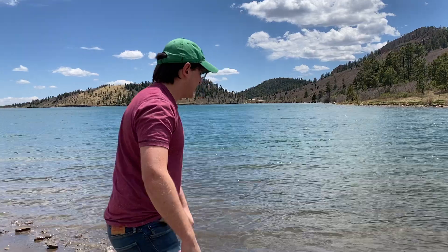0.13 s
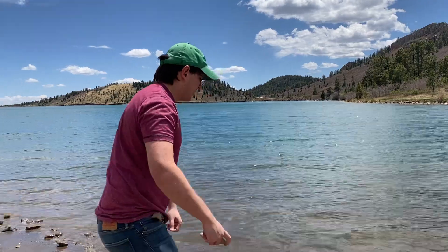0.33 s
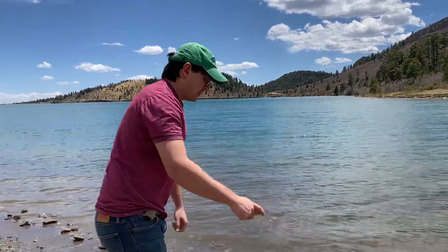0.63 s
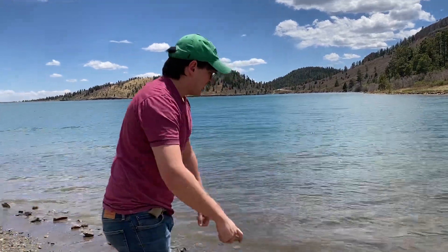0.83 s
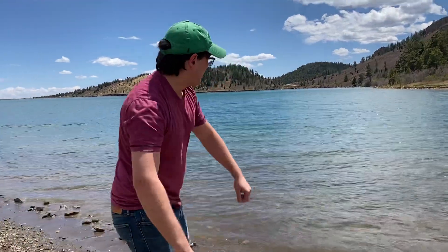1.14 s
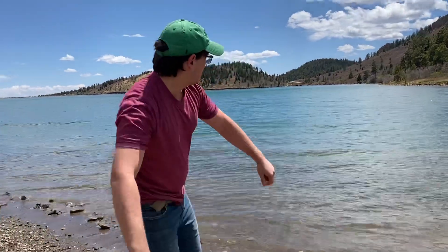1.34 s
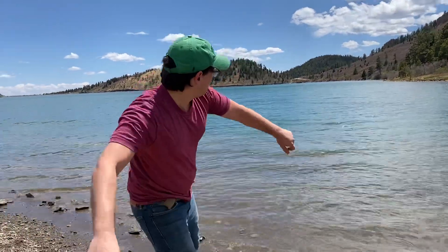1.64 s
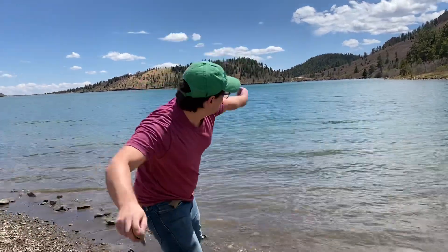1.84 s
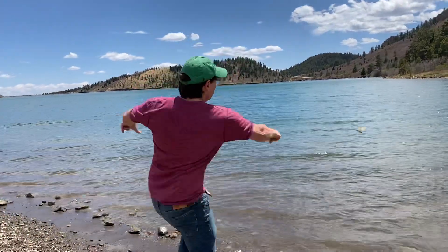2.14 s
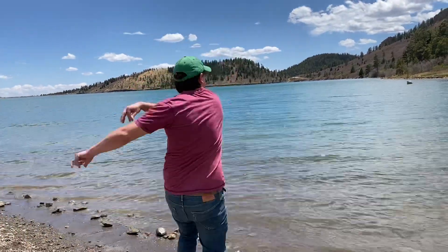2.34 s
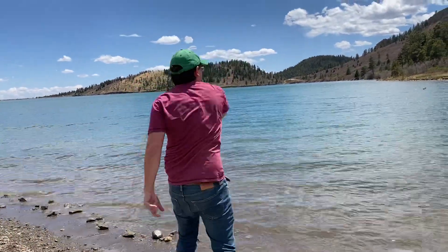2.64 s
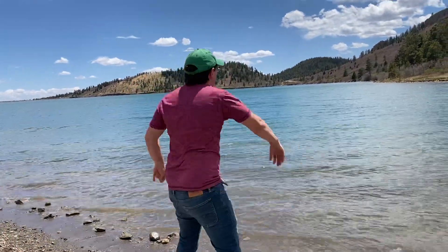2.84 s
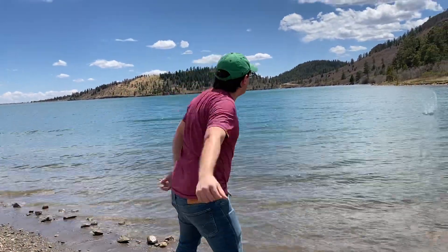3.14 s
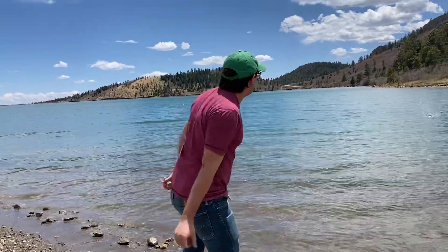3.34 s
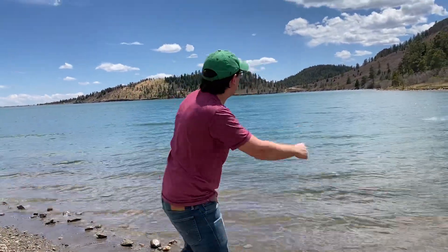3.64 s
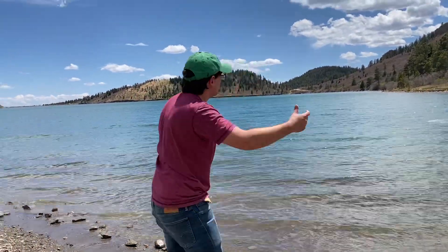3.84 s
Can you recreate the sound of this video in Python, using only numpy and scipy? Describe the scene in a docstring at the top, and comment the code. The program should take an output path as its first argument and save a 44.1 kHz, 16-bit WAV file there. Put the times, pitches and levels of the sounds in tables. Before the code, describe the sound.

Wind rumbles and flutters on a microphone while small waves lap a pebbly lake shore.

```python
"""Wind rumbles and flutters on a microphone at a pebbly lake shore; its eddies are short thumps that fall in pitch.
Small waves wash, gurgle and slop along the water's edge: shaped noise, ringing bubbles and a wandering hollow tone.
Shoes scuff the gravel during a throw: tiny random contacts over a grinding hiss.
Stones click, once sharply, as short bundles of ringing tones; pebbles knock dully and grit ticks."""
import sys
import numpy as np
from scipy import signal
from scipy.fft import rfft, irfft
from scipy.io import wavfile

SR = 44100
rng = np.random.default_rng(int(sys.argv[2]) if len(sys.argv) > 2 else 0)


def put_to_file(sound):
    """Save the sound as 16-bit audio at rate SR, in the file named by the first command-line argument."""
    columns = np.atleast_2d(sound).T  # one column per channel
    safe = np.clip(columns, -1, 1)
    whole_steps = np.round(safe * 32767)
    wavfile.write(sys.argv[1], SR, whole_steps.astype(np.int16))


N = 176400
SECONDS = N / SR
T = np.arange(N) / SR
HZ = np.maximum(np.fft.rfftfreq(N, 1 / SR), 1)


def from_db(db):
    """Turn decibels into a gain."""
    return 10 ** (np.asarray(db) / 20)


def rms_one(x):
    """Scale a sound to an average (rms) strength of 1."""
    return x / np.sqrt(np.mean(x ** 2) + 1e-20)


def at_time(rows, s=T):
    """Read a table of (time, value) with straight lines between its points."""
    return np.interp(s, *np.transpose(rows))


def at_hz(points, hz):
    """Read a table of (frequency, value) on a log-frequency axis."""
    table_hz, values = np.transpose(points)
    return np.interp(np.log(hz), np.log(table_hz), values)


def pan(db):
    """Gains for left and right: left goes up and right goes down by the given dB."""
    return from_db([[db], [-db]])


def add(out, s, sound):
    """Mix a sound into out, starting at time s."""
    i = int(np.clip(s * SR, 0, N - 1))
    out[:, i:i + sound.shape[-1]] += sound[..., :N - i]


def drift(rate_hz):
    """A smooth random curve of spread 1: noise through two equal low-pass steps, made every 40 samples."""
    r = np.exp(-80 * np.pi * rate_hz / SR)
    noise = rng.standard_normal(N // 40 + 2002)
    slow = signal.lfilter([1], [1, -2 * r, r * r], noise)[2000:]  # drop the filter's start-up
    return np.interp(np.arange(N) / 40, np.arange(len(slow)), rms_one(slow))


def widen(pair, alike):
    """Mix two unrelated signals into a left and right that are alike to the given degree."""
    alike = np.clip(alike, -.99, .99)
    middle = np.sqrt(1 + alike) * pair[0]
    side = np.sqrt(1 - alike) * pair[1]
    return middle + side * np.array([[1], [-1]])


# how alike left and right are in the coloured noises: (frequency [Hz], likeness [-1 to 1])
STEREO_LIKENESS = [(100, .6), (400, .55), (1000, .4), (1500, .1), (2100, .5), (3600, .62), (5300, .15),
                   (6600, .88), (9000, .96), (16000, .97)]


def colour(pair, spectrum):
    """Filter two unrelated signals to a spectrum and give them stereo width, at rms 1."""
    wide = widen(rfft(pair), at_hz(STEREO_LIKENESS, HZ))
    return rms_one(irfft(wide * from_db(at_hz(spectrum, HZ)), N))


def patchy_noise(patchy_db, rate_hz, count=12):
    """Two white noises, split into overlapping bands whose levels flicker, partly together."""
    white = rfft(rng.standard_normal((2, N)))
    out, together = 0, drift(rate_hz)
    place = np.interp(np.log(HZ), np.log([200, 14000]), [0, count - 1])
    for k in range(count):
        band = irfft(white * np.maximum(1 - abs(place - k), 0), N)
        out = out + band * from_db(patchy_db * (drift(rate_hz) + .5 * together))
    return out


# share of the wind that blows across the microphone: (time [s], share [0-1])
CROSSWIND = [(2.6, .1), (2.95, 1), (3.35, 0.86), (3.6, 0.03)]
EDDY_FALL_S, EDDY_END_HZ = 0.01006, 55.3   # time constant of the pitch fall, and the pitch it heads for
EDDY_ATTACK_S, EDDY_RELEASE_SHARE = 0.0024, 0.19   # the release is a share of the eddy's length
EDDY_PAN_DB, EDDY_LEAN_FROM_HZ = 3.5, 180   # in a full crosswind the quick swings lean to the left
CROSS_LAG_RAD, CROSS_LAG_BELOW_HZ = 1.5, 400   # and the slow swings reach the left later
EDDY_ROUGH, EDDY_SPREAD = .3, .45   # random part of a swing: common to both sides, and own to each
EDDY_WOBBLE, EDDY_WOBBLE_S = .18, .0025   # the pitch staggers: spread [natural log], time step


def eddy(s, db, start_hz, length):
    """A swirl of air passes the microphone: a few rough pressure swings that slow down."""
    t = np.arange(int(max(length, .004) * SR)) / SR
    pitch = EDDY_END_HZ + (start_hz - EDDY_END_HZ) * np.exp(-t / EDDY_FALL_S)
    stagger = np.interp(t / EDDY_WOBBLE_S, np.arange(32), rng.uniform(-1, 1, 32)) * np.sqrt(3)
    cycles = np.cumsum(pitch * np.exp(EDDY_WOBBLE * stagger)) / SR

    across = at_time(CROSSWIND, s)
    left_lag = across * CROSS_LAG_RAD / (1 + (pitch / CROSS_LAG_BELOW_HZ) ** 4)
    quickness = pitch ** 4 / (pitch ** 4 + EDDY_LEAN_FROM_HZ ** 4)
    lean = pan(across * EDDY_PAN_DB) ** quickness

    # slower partial swings of random strength make each eddy uneven
    chance = rng.standard_normal((3, 4, 2)) @ [1, 1j] / np.sqrt(8)
    partials = np.exp(2j * np.pi * np.outer([-.55, -.3, .15, .4], cycles))
    shared, left, right = chance @ partials
    uneven = 1 + EDDY_ROUGH * shared + EDDY_SPREAD * np.array([left, right])
    swing = np.exp(2j * np.pi * (cycles + rng.random()) - 1j * np.outer([1, 0], left_lag)) * uneven

    fade_in = np.minimum(t / EDDY_ATTACK_S, 1)
    fade_out = np.minimum((t[-1] - t) / (EDDY_RELEASE_SHARE * t[-1]), 1)
    return from_db(db) * lean * swing.real * np.sin(fade_in * fade_out * np.pi / 2) ** 2


# strength of the wind, which each wind layer follows with its own offset: (time [s], level [dB])
GUST = [(0, -67), (.25, -62), (.35, -44.5), (.44, -56), (.57, -42.5), (.85, -50.5), (1.3, -44), (1.6, -43),
        (1.9, -37.5), (2.15, -46), (2.45, -42.5), (2.65, -41), (2.8, -47), (2.95, -41), (3.1, -37.5),
        (3.3, -38), (3.38, -44.5), (3.8, -47), (4, -50.5)]
# the strong eddies: (time [s], level before EDDY_DB [dB], pitch before the fall and stagger [Hz], length [s])
EDDIES = [(0.146, -40, 285, 0.031), (0.399, -37.5, 511, 0.013), (0.44, -37, 1000, 0.005),
          (0.491, -30, 118, 0.028), (0.536, -39.5, 580, 0.011), (0.562, -35, 404, 0.013),
          (0.607, -34, 476, 0.0091), (0.629, -40, 433, .018), (0.795, -33.5, 588, 0.022),
          (0.813, -31.5, 787, 0.0095), (0.965, -30.5, 422, 0.0087), (0.978, -28, 417, 0.022),
          (1.092, -34, 486, 0.0097), (1.171, -31, 483, 0.016), (1.173, -22, 131, 0.023),
          (1.345, -36.5, 487, 0.015), (1.517, -35, 423, 0.023), (1.535, -29.5, 250, 0.057),
          (1.621, -27, 717, 0.01), (1.631, -27.5, 430, 0.037), (1.667, -22.5, 515, 0.027),
          (1.818, -36, 91, 0.025), (1.884, -27.5, 542, 0.014), (1.91, -24, 330, 0.012),
          (1.917, -22.5, 592, 0.039), (1.966, -29.5, 324, 0.031), (2.285, -33.5, 456, 0.022),
          (2.382, -26, 370, 0.0192), (2.45, -29, 341, 0.052), (2.465, -28.5, 465, 0.017),
          (2.511, -30, 533, 0.029), (2.589, -33.5, 484, 0.0099), (2.655, -27.5, 245, 0.018),
          (2.674, -28.5, 137, 0.02), (2.694, -29, 304, 0.017), (2.9575, -19, 560, 0.012),
          (2.969, -20.5, 620, 0.018), (2.98, -16.5, 420, 0.023), (3.011, -22.5, 435, 0.0087),
          (3.023, -22, 507, 0.019), (3.08, -28.5, 517, 0.019), (3.099, -24.5, 513, 0.0048),
          (3.1205, -19, 624, 0.022), (3.171, -24, 223, 0.052), (3.246, -26, 550, 0.011),
          (3.26, -26, 575, 0.023), (3.311, -26, 534, 0.017), (3.32, -29, 417, 0.033),
          (3.42, -33, 450, 0.029), (3.479, -35, 381, 0.017), (3.59, -28, 478, 0.017),
          (3.605, -23, 89.5, 0.032)]
# tone of the rumble, before a further treble cut: (frequency [Hz], relative level [dB per Hz])
RUMBLE = [(20, -28), (35, -5.5), (62, 4), (100, -3.5), (180, -15), (350, -38), (600, -47), (1200, -55)]
# tone of the fine turbulence: (frequency [Hz], relative level [dB per Hz])
FLUTTER = [(50, -25), (150, 9), (320, -1), (520, -4.5), (750, -19), (1200, -20), (2500, -61)]
EDDY_DB = -4
SMALL_EDDIES_PER_S, SMALL_EDDY_DB, SMALL_EDDY_SCATTER_DB = 49, -8.5, 5.5   # level is relative to the gust
SMALL_EDDY_HZ, SMALL_EDDY_S = 407, 0.0119   # middle pitch and length; each eddy varies around them
RUMBLE_DB, RUMBLE_LIKENESS = 2, 0.24   # level relative to the gust; left-right likeness
FLUTTER_DB, FLUTTER_AT_GUST_DB = -46.5, -40   # flutter level when the gust has the second level
FLUTTER_GROWTH = 1.75   # dB gained per dB of gust


def wind():
    """Moving air presses on the microphone: lumpy rumble, fine flutter and eddies large and small."""
    gust_db = at_time(GUST)
    noise = rfft(widen(rng.standard_normal((2, N)), RUMBLE_LIKENESS))
    noise = noise * from_db(at_hz(RUMBLE, HZ)) / (1 + (HZ / 1500) ** 4)
    lumpy = rms_one(irfft(noise, N) * from_db(4.8 * drift(28.0)))
    rumble = lumpy * from_db(gust_db + RUMBLE_DB)

    bursts = from_db(15.0 * np.tanh(drift(27.0)))
    flutter = colour(rng.standard_normal((2, N)) * bursts, FLUTTER)
    flutter_db = FLUTTER_DB + FLUTTER_GROWTH * (gust_db - FLUTTER_AT_GUST_DB)
    out = rumble + flutter * from_db(flutter_db) * pan(EDDY_PAN_DB / 2)

    for s, db, hz, length in EDDIES:
        add(out, s, eddy(s, db + EDDY_DB, hz, length))
    for _ in range(int(SMALL_EDDIES_PER_S * SECONDS)):
        s = rng.uniform(0, SECONDS)
        size, pitch, length = rng.uniform(-1, 1, 3)
        db = at_time(GUST, s) + SMALL_EDDY_DB + SMALL_EDDY_SCATTER_DB * size
        add(out, s, eddy(s, db, SMALL_EDDY_HZ * 1.6 ** pitch, SMALL_EDDY_S * 1.43 ** length))
    return out


BUBBLE_CYCLES, BUBBLE_RISE = 4.12, 0.089   # cycles in one decay time; share of pitch gained in that time


def bubble(db, hz):
    """Air trapped in water rings for a few cycles and rises in pitch."""
    life = BUBBLE_CYCLES / hz
    age = np.arange(int(4 * life * SR)) / SR / life
    ring = np.sin(2 * np.pi * BUBBLE_CYCLES * (age + BUBBLE_RISE * age ** 2 / 2))
    return from_db(db) * ring * np.exp(-age) * (1 - np.exp(-8 * age))


# the wash of the waves, before each layer's offset: (time [s], level [dB])
WASH = [(0, -62), (.25, -49), (.5, -51.5), (.63, -47.5), (.82, -45), (1.05, -50), (1.4, -54.5),
        (1.7, -56.5), (2.0, -50.5), (2.65, -54), (2.92, -50.5), (3.27, -47), (3.36, -48.5), (3.6, -50.5),
        (3.8, -47), (4, -47)]
# brightness as waves break on the pebbles: (time [s], treble boost, doubled at the very top [dB])
SPARKLE = [(0, -15), (.4, 3.5), (.8, -0.5), (1.3, 2.5), (1.7, 1.5), (2.7, 4.5), (2.95, -3.5), (3.25, -2.5),
           (3.6, 1), (4, -6.5)]
# tone of the wash, before the sparkle: (frequency [Hz], relative level [dB per Hz])
WATER = [(100, 8), (300, -0.5), (600, -1.5), (1100, -1), (1500, -4), (2000, -5.5), (2800, -9.5),
         (4200, -13), (6800, -19), (10000, -21), (16000, -26)]
# single plops at the water's edge, before the bubble's fade and rise: (time [s], level [dB], pitch [Hz])
PLOPS = [(0.5945, -38, 1890), (0.6265, -48, 1260), (0.733, -38.5, 947), (.806, -32.5, 806),
         (.895, -40.5, 573), (2.731, -45.5, 1080), (3.684, -33, 682)]
WATER_DB, TREBLE_FROM_HZ, TOP_FROM_HZ = -2, 1600, 9600
LAPS_PER_S, LAP_DB = 6.4, -2   # bubbles come in clumps: speed of the random drift [Hz], its depth
BUBBLES_PER_S, BUBBLE_DB, BUBBLE_LOW_HZ, BUBBLE_HIGH_HZ = 270, -5.5, 555, 7470
RIPPLES_PER_S, RIPPLE_DB = 97, -5   # larger bubbles in the lapping edge
RIPPLE_HZ, RIPPLE_OCTAVES = 1133, 1.075   # middle pitch, and how far it spreads up and down


def water():
    """Waves wash over the pebbles: a patchy hiss, clumps of fine and larger bubbles, and louder plops."""
    hiss = rfft(colour(patchy_noise(patchy_db=3.0, rate_hz=35.6), WATER))
    treble = irfft(hiss / (1 + (TREBLE_FROM_HZ / HZ) ** 4), N)
    top = irfft(hiss / (1 + (TOP_FROM_HZ / HZ) ** 4), N)
    sparkle = from_db(at_time(SPARKLE))
    bright = irfft(hiss, N) - treble + sparkle * (treble - top) + sparkle ** 2 * top
    out = bright * from_db(at_time(WASH) + WATER_DB)

    lapping_db = at_time(WASH) + LAP_DB * np.tanh(drift(LAPS_PER_S))
    for when, pitch, size, side in rng.random((int(BUBBLES_PER_S * SECONDS), 4)):
        hz = BUBBLE_LOW_HZ * (BUBBLE_HIGH_HZ / BUBBLE_LOW_HZ) ** pitch
        db = lapping_db[int(when * N)] + BUBBLE_DB + 12 * (size ** 4 - .5)
        db = db + 0.043 * at_hz(WATER, hz)  # high bubbles are slightly weaker
        add(out, when * SECONDS, bubble(db, hz) * pan(5 * (side - .5)))
    for when, pitch, size, side in rng.random((int(RIPPLES_PER_S * SECONDS), 4)):
        hz = RIPPLE_HZ * 2 ** (RIPPLE_OCTAVES * (2 * pitch - 1))
        db = lapping_db[int(when * N)] + RIPPLE_DB + 9 * (size ** 2 - .5)
        add(out, when * SECONDS, bubble(db, hz) * pan(6 * (side - .5)))
    for s, db, hz in PLOPS:
        add(out, s, bubble(db, hz))
    return out * pan(0.2)


# shoes grinding on gravel, before the layer offsets: (time [s], length [s], level [dB], extra treble [dB])
SCUFFS = [(0.033, 0.11, -49, -7), (0.1, 0.06, -52, 0), (1.909, 0.017, -46, -8), (2.03, 0.063, -39.5, -10),
          (2.1, 0.098, -39, -11.5), (2.187, 0.053, -48.5, 1.5), (2.264, 0.056, -46, -7.5),
          (2.334, 0.06, -43.5, -6), (2.403, 0.034, -46.5, 1), (2.478, 0.032, -47, -4.5),
          (3.019, 0.011, -45, -8.5)]
# tone of the gravel, before the extra treble: (frequency [Hz], relative level [dB per Hz])
GRAVEL = [(200, -15.5), (450, -3), (750, -10.5), (1100, -1.5), (1500, -7.5), (2000, -2.5), (2800, -7.5),
          (4000, -6), (6800, -15.5), (10000, -13.5), (16000, -22)]
SCUFF_ATTACK_S, SCUFF_RELEASE_S = 0.008, 0.052
GRAINS_PER_S, GRAIN_DB, GRIND_DB, GRIT_FROM_HZ = 850, -3, 1, 1530


def gravel():
    """A sole presses and slides: a dense crunch of tiny contacts over a grinding hiss."""
    body_power, grit_power = 0, 0
    for s, length, db, treble_db in SCUFFS:
        attack = np.clip((T - s) / SCUFF_ATTACK_S, 0, 1)
        release = np.exp(-np.maximum(T - s - length, 0) / SCUFF_RELEASE_S)
        press = from_db(db) * attack * release
        body_power = body_power + press ** 2
        grit_power = grit_power + (press * from_db(treble_db)) ** 2

    hits = rng.random((2, N)) < GRAINS_PER_S / SR
    strength = from_db(4.2 * np.minimum(rng.exponential(1, (2, N)), 4))
    grains = hits * rng.choice([-1, 1], (2, N)) * strength
    grind = colour(patchy_noise(patchy_db=3.1, rate_hz=130), GRAVEL)
    crunch = from_db(GRAIN_DB) * colour(grains, GRAVEL) + from_db(GRIND_DB) * grind
    grit = irfft(rfft(crunch) / (1 + (GRIT_FROM_HZ / HZ) ** 4), N)
    return (np.sqrt(body_power) * (crunch - grit) + np.sqrt(grit_power) * grit) * pan(0.53)


# stones knocking together, before each tone's own level: (time [s], level [dB])
CLACKS = [(2.203, -45), (2.3365, -23), (2.34, -37), (3.029, -35.5)]
# ringing tones of a stone: (frequency [Hz], level relative to the clack [dB], time to fall by 60 dB [s])
STONE = [(1830, -8.5, 0.009), (3160, -4.5, 0.0089), (3680, -9.5, 0.013), (4820, 0.5, 0.0056),
         (6600, 2.5, 0.0031), (7200, 12, 0.0012), (14200, -3, 0.0018)]
# larger pebbles shifting under the sole, before fading in and out: (time [s], level [dB], pitch [Hz])
KNOCKS = [(2.1088, -31.5, 1060), (2.204, -32.5, 640), (2.205, -36, 1160), (2.3527, -32.5, 1180),
          (2.3568, -28.5, 1780), (2.3742, -28.5, 1860), (2.398, -34, 1720), (2.4464, -29.5, 1950),
          (2.5, -30.5, 1860)]
# bits of grit ticking: (time [s], peak level [dB])
TICKS = [(.320, -39), (.396, -31.5), (0.403, -34.5), (0.594, -44), (2.204, -27.5), (2.546, -38),
         (2.697, -40), (3.149, -42), (3.525, -38)]
KNOCK_CYCLES, KNOCK_ATTACK_S = 2.85, 0.00067   # cycles in one decay time; fade-in
TICK_LOW_HZ, TICK_HIGH_HZ, TICK_DECAY_S = 5000, 14900, 0.0016


def stones():
    """Pebbles clack and ring for a few milliseconds, bedded ones knock dully, grit ticks thin and high."""
    out, t = np.zeros((2, N)), T[:SR // 40]
    for s, db in CLACKS:
        for hz, tone_db, t60 in STONE:
            phase = rng.uniform(0, 2 * np.pi) + 0.63 * rng.standard_normal((2, 1))
            ring = np.sin(2 * np.pi * hz * t + phase) * np.minimum(t / 0.00017, 1)
            add(out, s, from_db(db + tone_db - 60 * t / t60) * ring)
    for s, db, hz in KNOCKS:
        phase = 0.34 * rng.standard_normal((2, 1))
        ring = np.sin(2 * np.pi * hz * t + phase) * np.exp(-t * hz / KNOCK_CYCLES)
        add(out, s, from_db(db) * ring * np.minimum(t / KNOCK_ATTACK_S, 1))
    band = signal.butter(2, [TICK_LOW_HZ, TICK_HIGH_HZ], "band", fs=SR, output="sos")
    for s, db in TICKS:
        burst = widen(rng.standard_normal((2, len(t))), 0.84) * np.exp(-t / TICK_DECAY_S)
        tick = signal.sosfilt(band, burst)
        add(out, s, from_db(db) * tick / abs(tick).max())
    return out


# wavelets slopping on the shore: (time of the crest [s], level [dB])
WAVELETS = [(0.629, -49), (.815, -56), (3.27, -53.5), (3.44, -53), (3.68, -52.5), (3.77, -62.5)]
# tone of their spray: (frequency [Hz], relative level [dB per Hz])
SPRAY = [(300, -25), (900, 11.5), (2100, 4.5), (3200, -11.5), (4500, -0.5), (7000, -14.5), (16000, -47)]
WAVELET_RISE_S, WAVELET_DRAIN_S = 0.0094, 0.045   # time constants


def wavelets():
    """Single wavelets slop onto the pebbles: patchy noise swells quickly and drains away."""
    swell = 0
    for s, db in WAVELETS:
        pace = np.where(T < s, WAVELET_RISE_S, WAVELET_DRAIN_S)
        swell = swell + from_db(db) * np.exp(-np.abs(T - s) / pace)
    return swell * colour(patchy_noise(patchy_db=6.0, rate_hz=48, count=7), SPRAY)


# the hollow ring of an incoming wave: (time [s], middle pitch [Hz], level [dB])
GURGLE = [(.65, 765, -60), (0.721, 950, -55), (0.779, 1090, -66), (0.901, 1044, -59.5), (1.0, 960, -61)]
GURGLE_WIDTH_HZ = 37   # speed of the random drift that blurs the tone


def gurgle():
    """As a wave runs in, a hollow, uneven resonance rises in pitch and sinks again."""
    s, hz, db = np.transpose(GURGLE)
    turning = np.exp(2j * np.pi * np.cumsum(np.interp(T, s, hz)) / SR)
    level = from_db(np.interp(T, s, db)) * (T > s[0]) * (T < s[-1])
    pair = []
    for _ in range(2):
        uneven = drift(GURGLE_WIDTH_HZ) + 1j * drift(GURGLE_WIDTH_HZ)
        pair.append((uneven * turning).real)
    return level * rms_one(widen(pair, 0.41))


def scene():
    """Wind over the lake, with gravel and stones underfoot."""
    return wind() + water() + gravel() + stones() + wavelets() + gurgle()


TWIST_FROM_HZ, TWIST_HALF_TURN_HZ = 7050, 2045   # where the phase starts to turn; width of half a turn
LOW_CUT_HZ, CUTOFF_HZ, START_S = 34, 15900, .035   # silent until START_S


def record(dry):
    """A stereo microphone turns the right side's high treble in phase, in soft steps; both ends are cut."""
    turn = np.pi * np.maximum(HZ - TWIST_FROM_HZ, 0) / TWIST_HALF_TURN_HZ
    turn = turn - np.sin(2 * turn) / 2
    spectrum = rfft(dry) / np.sqrt(1 + (LOW_CUT_HZ / HZ) ** 10)
    heard = irfft(spectrum * np.exp(1j * np.outer([0, 1], turn)), N) * (T > START_S)
    return signal.sosfilt(signal.ellip(10, .1, 80, CUTOFF_HZ, fs=SR, output="sos"), heard)


dry = scene()
out = record(dry)
put_to_file(out)
```